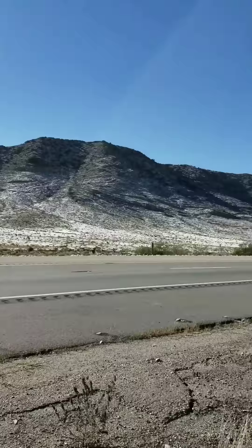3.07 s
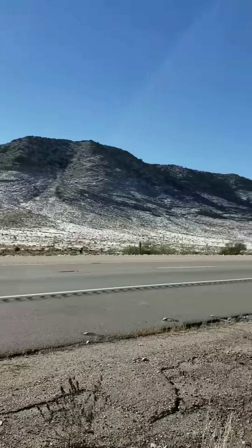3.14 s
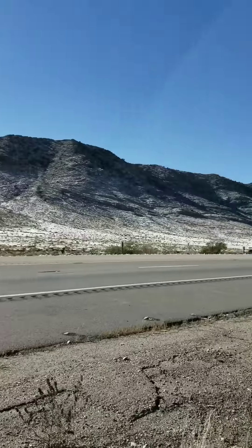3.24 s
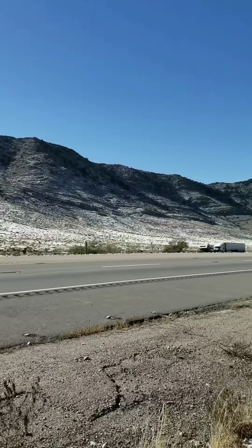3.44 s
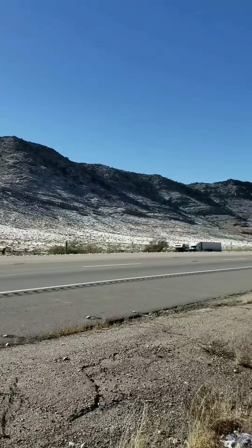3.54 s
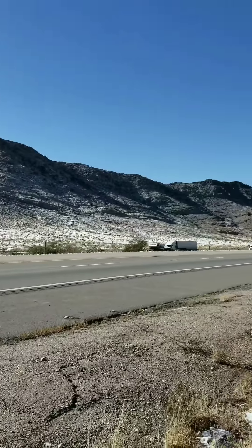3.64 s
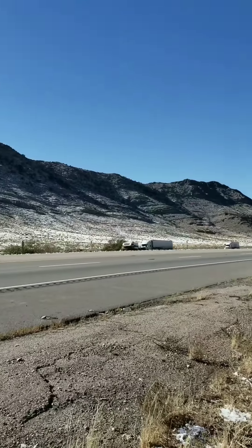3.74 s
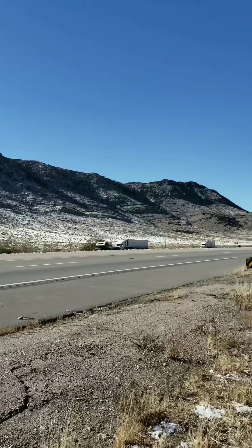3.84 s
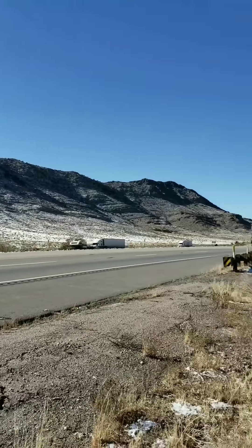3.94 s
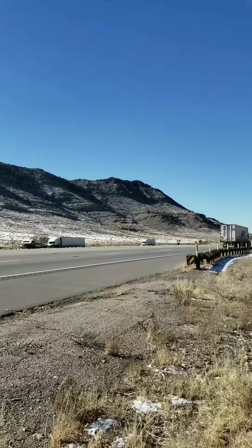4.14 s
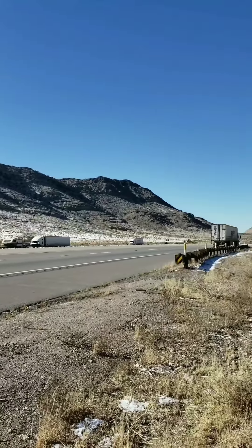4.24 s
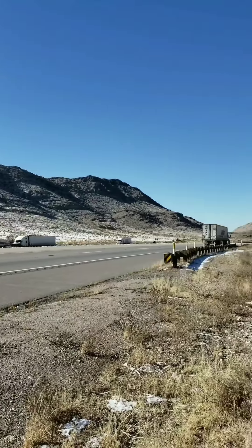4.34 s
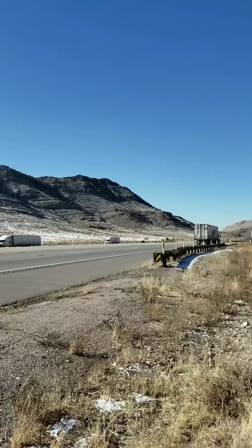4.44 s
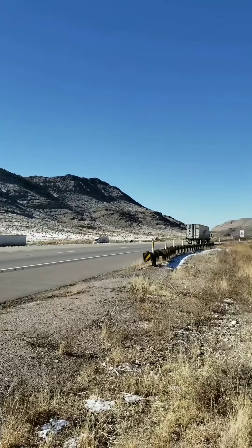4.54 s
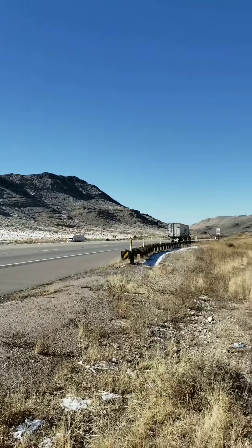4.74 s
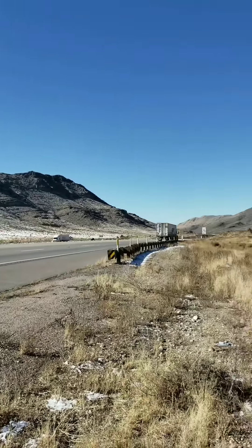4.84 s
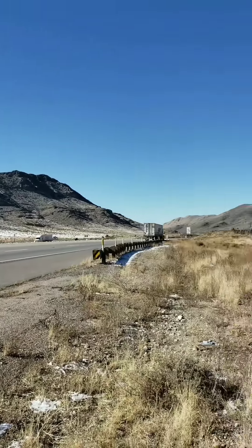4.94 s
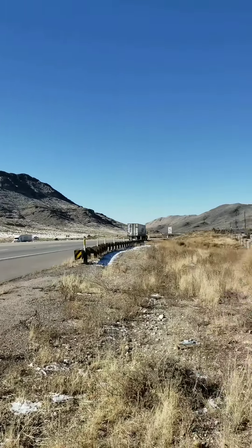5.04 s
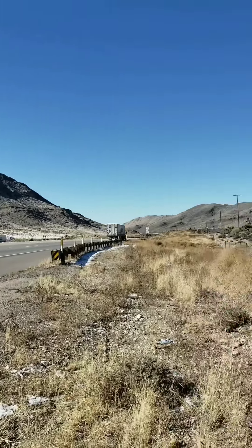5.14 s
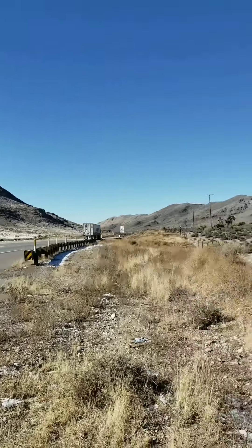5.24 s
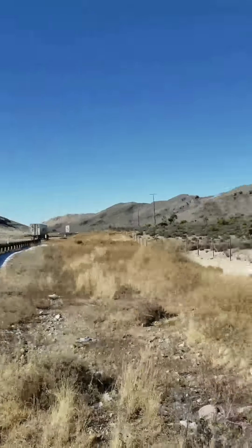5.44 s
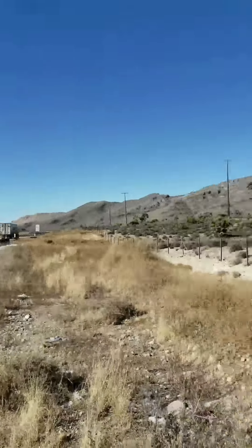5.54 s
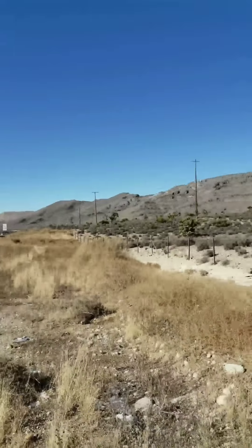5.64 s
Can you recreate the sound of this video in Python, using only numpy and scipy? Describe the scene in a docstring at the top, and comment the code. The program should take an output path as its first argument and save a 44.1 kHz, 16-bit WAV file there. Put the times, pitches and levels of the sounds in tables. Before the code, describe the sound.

Outdoors beside an open desert highway, heard from a hand-held phone. A wind bump starts it while a truck's tyre roar builds fast, jumping up around 0.5 s. It is loud and broad from about 0.7 to 1.9 s, passing closest near 1 s, with a wavering, broken tread whine that slides down in pitch. From roughly 1.7 to 2.7 s, wake wind strikes the two microphone ports separately: deep thumps, rapid fluttering and blunt pops, heaviest around 1.8 to 2.3 s, slightly overloaded. The roar falls away with a thin sizzle, mostly gone by 3.3 s. Then it is quiet, with a patchy mid-pitched hum of far traffic and faint hiss. Irregular wind puffs, low bumps and crackles, often toward the left, continue from 3.4 s, with dry finger ticks and soft rustles on the case near 3.6, 4.2, 5.2 and 5.6 s. A sharp wind cluster lands at the end.

```python
"""A roar swells fast: a long truck passes 11 m from a hand-held phone at the edge of an open desert highway.
Its tyres roar as shaped noise and their tread whines as two partials, falling in pitch as it goes by.
Wind, strongest in the truck's wake, buffets the two microphone ports separately, as noise and short bursts.
Far traffic hums behind as a patchy noise band; fingers tick and rustle on the case; the microphones hiss."""
import sys
import numpy as np
from scipy import signal
from scipy.io import wavfile
from scipy.ndimage import uniform_filter1d

SR = 44100
rng = np.random.default_rng(int(sys.argv[2]) if len(sys.argv) > 2 else 0)


def invert_db(x):
    """Field ratio 10**(x/20) for x, a level in decibels (scalar or array-like)."""
    u = np.asarray(x, float) / 20
    return 10 ** u


def pcm_store(signal):
    """Save signal as 16-bit PCM."""
    levels = np.round(np.clip(np.atleast_2d(signal), -1, 1) * 32767)
    wavfile.write(sys.argv[1], SR, levels.astype(np.int16).T)


N = 250929

FRAME, HOP = 512, 128  # samples per noise frame and step
HZ = np.fft.rfftfreq(FRAME, 1 / SR)
FRAMES_S = np.arange(N // HOP + 5) * HOP / SR

# In every table pan_db is left over right. Spectra are relative: each is scaled to power 1 before its level.

# Distant traffic hum: hz, density_db_per_hz
FAR_SPECTRUM = [(300, -25), (550, -34), (800, 10.5), (1150, 0), (1400, 0.5), (1650, 0), (1900, -4),
                (2300, -11), (3000, -29), (4500, -35.5)]
# Its level as the phone turns along the road: start_s, level_db
FAR_LEVEL = [(0, -41.5), (3, -40), (4.2, -47), (4.7, -45.5), (5.15, -46.5), (5.69, -45)]
# A pale band that drifts as vehicles come and go: start_s, centre_hz, lift_db
FAR_BAND = [(3, 1500, -5), (4.2, 1500, 2), (4.65, 1650, 3.5), (4.8, 1730, 10), (5.05, 1740, 1),
            (5.3, 1800, -1), (5.4, 2030, 6.5), (5.69, 1600, -3)]
FAR_BAND_OCTAVES, FAR_PATCHY_DB = .2, 3.0

# Likeness of road sound at the two ports: hz, shared_power (0-1)
PORT_LIKENESS = [(60, 0.18), (110, 0.25), (200, 0.96), (370, 0.75), (680, 0.75), (1240, 0.91), (2260, 0.83),
                 (4150, 0.27), (7600, 0.01), (13900, 0.06)]
# Phase by which the left port leads on road sound: hz, lead_rad
PORT_LEAD = [(100, -0.046), (1000, -0.35), (2150, -0.72), (2700, -0.9), (4100, -0.16), (6500, -1.44)]
# Balance from the phone's body in the way of road sound: hz, pan_db
BODY_SHADE = [(60, -7), (150, -2), (370, 0), (910, -0.5), (2260, -2.5), (5610, 1), (13900, -4.5)]
# Brief level dips of one port after a cluster of puffs: centre_s, depth_db, length_s, port (0 left, 1 right)
PORT_DIPS = [(3.91, -4, 0.015, 1), (4.25, -12, 0.027, 0), (4.455, -21, 0.011, 0)]

# Microphone hiss: hz, density_db_per_hz
SELF_SPECTRUM = [(2350, -16), (4000, 3.5), (5340, -5), (7930, -2.5), (9310, -30), (11500, -16.5),
                 (14400, -14)]
SELF_DB = -66
# Faint treble hiss that swells now and then: centre_s, peak_db, length_s
HISS_SWELLS = [(3.0, -66, .4), (4.18, -66, .03), (4.33, -65, .04), (5.06, -70, .05), (5.34, -64, .03),
               (5.62, -64, .07)]
# Colour of those swells: hz, density_db_per_hz
SWELL_SPECTRUM = [(3000, -18), (5500, 0), (8000, -1), (9500, -14), (12000, -2), (14400, -2)]

# Gusts on the ports: centre_s, rumble_db, flutter_db, length_s (before any stretch), pan_db
GUSTS = [(.01, -32, -26, 0.0083, 7), (0.184, -36.5, -40, 0.08, 2), (0.285, -24.5, -22.5, 0.017, 3),
         (0.343, -25.5, -23.5, 0.029, -2.5), (0.544, -31.5, -31.5, 0.056, 2),
         (0.843, -35.5, -51, 0.051, -1), (1.64, -32, -32.5, 0.064, -1), (1.725, -28, -18, 0.023, 4.5),
         (1.83, -29, -14, 0.034, -3), (1.91, -20.5, -10, 0.013, 3), (2.043, -24, -14, 0.076, -1),
         (2.118, -41, -16.5, 0.031, -2), (2.201, -25.5, -16, 0.033, -1.5), (2.302, -43, -16, 0.02, -1.5),
         (2.387, -30, -20.5, 0.045, -2), (2.498, -30.5, -21, 0.053, -3.5), (2.566, -28, -23.5, 0.034, 3),
         (2.618, -29.5, -21.5, 0.012, 2), (2.672, -31, -23.5, 0.027, 1), (2.832, -35, -30.5, 0.061, 0),
         (2.939, -44, -29, 0.041, 1.5), (3.016, -36, -33.5, 0.038, 6), (3.13, -33.5, -36, 0.029, 1),
         (3.366, -35.5, -43, 0.069, 10), (3.45, -33, -37, 0.016, -5.5), (3.511, -24, -35.5, 0.0088, 5),
         (3.603, -36, -34.5, 0.031, -2), (3.673, -27.5, -35, 0.055, -1), (3.774, -31, -38.5, 0.043, -2.5),
         (3.866, -22.5, -30, 0.03, 2), (3.946, -25, -34, 0.035, -2.5), (4.027, -28.5, -50, 0.025, -1),
         (4.116, -25, -38, 0.022, 4), (4.16, -25, -34, 0.019, -1), (4.184, -32, -36, 0.0096, 15),
         (4.322, -36, -47, 0.056, 7.5), (4.415, -31.5, -42.5, 0.014, 8.5), (4.485, -31.5, -42.5, 0.011, 19),
         (4.696, -35.5, -48, 0.034, 1.5), (4.787, -45, -54, 0.1, 19), (4.92, -28, -38.5, 0.016, 0),
         (5, -39, -45, 0.014, 16), (5.218, -23, -30, 0.015, 2), (5.244, -38, -38, 0.0067, -15),
         (5.274, -30.5, -42, 0.039, 9), (5.362, -25, -35.5, 0.003, 12), (5.43, -36.5, -41, 0.0089, 2),
         (5.473, -36.5, -46.5, 0.043, 6.5), (5.611, -22, -28.5, 0.01, 2.5), (5.652, -29, -33, 0.0077, 7),
         (5.678, -30.5, -19.5, 0.011, 1.5)]
# Rumble of large eddies: hz, density_db_per_hz
RUMBLE_SPECTRUM = [(20, -19), (40, -9), (70, 1.5), (130, -3), (200, -3), (300, -10), (420, -20), (600, -33),
                   (1200, -80)]
# Flutter of small eddies: hz, density_db_per_hz
FLUTTER_SPECTRUM = [(100, -22.5), (220, -7), (340, 0), (520, -9.5), (800, -13), (1300, -26), (2500, -41),
                    (5000, -70.5)]
CALM_DB, LULL_DB = -36, -53.5  # floors between gusts: rumble, flutter
RUMBLE_STRETCH = 1.37  # large eddies last longer than small ones

# Sudden puffs: start_s, peak_db, pan_db
PUFFS = [(.525, -23, 6), (1.836, -9, 10), (1.914, -33, 6), (1.964, -15.5, -13), (2.002, -18, -5),
         (2.03, -8.5, -12), (2.064, -10.5, -3), (2.129, -10, 3), (2.174, -12, -2), (2.21, -8, -4),
         (2.234, -12.5, -9), (2.294, -10.5, 0), (2.384, -25, -13), (2.489, -16, -6), (2.557, -17, -9),
         (2.603, -20, 1), (2.663, -26, 7), (3.35, -33, 16), (3.69, -29, -7), (3.836, -31, 3),
         (3.869, -38, -2), (3.892, -39, -22), (4.154, -31, -4), (4.193, -23.5, 12), (4.203, -37, 28),
         (4.212, -30, 13), (4.334, -28, 11), (4.393, -27, 4), (4.408, -31, 14), (4.429, -30, 17),
         (4.477, -33.5, 13), (4.487, -36, 12), (4.508, -39, 33), (4.756, -30, 15), (4.878, -31, 2),
         (4.895, -32, 14), (5.012, -34, 14), (5.11, -31, 13), (5.168, -29, 12), (5.187, -33, 6),
         (5.243, -17, 8), (5.273, -28, 11), (5.321, -34, 19), (5.36, -32, 16), (5.548, -33, 5),
         (5.611, -34, -17), (5.514, -32, 16), (5.637, -27, 10), (5.666, -26, -3), (5.672, -13.5, -5),
         (5.677, -15, 10), (5.683, -19.5, 15)]
PUFF_AT_DB, PUFF_HZ, PUFF_S = -25, 827, 0.0012  # a puff of this peak has this typical centre and length
DEEPER_PER_DB, LONGER_PER_DB = .015, 0.13  # stronger puffs are lower and longer (log share per dB)
PUFF_SCATTER, STEP_SHARE = .12, .5  # log spread of centre and length; how much of a puff is one plain push
SMALL_PUFFS, SMALL_FROM_S = 36, 3.3  # faint puffs at random moments once the phone turns into the wind
SMALL_DB, SMALL_PAN_DB = -41, 13  # their middle peak and balance
BURST_RISE_S, SOFT_START = .0008, .3  # shortest rise; rise as a share of a burst's length

# Wind puffs with their own centre and length, from low thumps to crackle:
# start_s, peak_db, pan_db, centre_hz, length_s
TUNED_PUFFS = [(3.36, -25, 13, 800, .004), (3.512, -28, 6, 700, .005), (3.586, -23.5, 13, 794, 0.0051),
               (3.61, -33, 14, 700, 0.0037), (3.63, -30, 15, 795, 0.0062), (3.878, -25, -15, 794, 0.0046),
               (3.818, -31, -2, 800, 0.015), (3.864, -24, -3, 750, .01), (3.885, -26, -2, 800, .006),
               (3.93, -31, -3, 700, .012), (4.004, -21, 0, 260, 0.0024), (4.01, -26, -2, 745, .008),
               (4.175, -34, 4, 700, .01), (4.203, -29, 11, 1000, .008), (4.838, -32.5, 5, 604, 0.0045),
               (5.207, -26, 7, 302, .004), (5.212, -18, 4, 560, .002), (5.219, -19, 1, 356, 0.0024),
               (5.236, -20, 7, 1080, 0.0052), (5.24, -41.5, -1, 2160, 0.0046)]
# Dry ticks and rustles of fingers on the case: start_s, peak_db, pan_db, centre_hz, length_s
TICKS = [(3.59, -41, 0, 2600, 0.0076), (3.648, -40, 1, 2250, .004), (3.875, -52, -5, 3400, .008),
         (3.892, -49, 0, 3200, .002), (4.172, -48, -5, 5500, .002), (4.174, -43, 7, 4000, 0.0033),
         (4.204, -30.5, 10, 1800, 0.0022), (4.205, -40, 0, 3000, .002), (4.195, -36, 8, 1300, .002),
         (4.335, -35, 10, 1700, .002), (4.487, -37.5, 8, 1800, .002), (4.508, -39, 10, 1900, .002),
         (4.13, -56, -12, 7000, 0.082), (4.178, -50, -10, 4540, 0.037), (4.26, -49, -1, 3500, .003),
         (4.412, -49, -3, 3800, .003), (4.438, -52, -3, 4000, .003), (5.042, -53, -7, 4500, .002),
         (5.117, -50, 4, 3180, .003), (5.221, -38, 1, 2000, .002), (5.238, -34, 8, 2300, .002),
         (5.244, -35, 8, 2600, .002), (5.36, -40, 8, 1600, .003), (5.33, -60, -12, 7000, 0.045),
         (5.6, -49, 0, 3020, 0.055), (5.641, -41, 5, 2500, 0.0067), (5.657, -45, 0, 2200, 0.0036),
         (5.666, -40, 2, 3200, .002), (5.676, -37.5, 7, 3260, 0.0035)]

PASS_S, SPEED_M_PER_S, LANE_M = 1.04, 27., 11  # closest moment, truck speed, distance to its lane
REAR_BEHIND_S = 0.33  # the trailer's wheels pass this much later
TREAD_HZ = 432  # tread blocks a second, before Doppler and waver

# Whine swelling as each group of wheels goes by:
# centre_s, partial (1-2), axle (0 front, 1 rear), peak_db (rms, before flutter), length_s
WHINE = [(0.37, 2, 0, -26, 0.02), (0.57, 2, 0, -17, 0.02), (0.704, 1, 0, -22, 0.072),
         (0.72, 2, 0, -17, 0.035), (0.835, 2, 0, -12.5, 0.04), (0.91, 2, 0, -19, 0.013),
         (0.99, 2, 0, -20, 0.052), (1.064, 1, 0, -15, 0.077), (1.17, 2, 0, -21, 0.065),
         (1.185, 2, 1, -22, .08), (1.6, 2, 1, -27, .1), (1.346, 1, 0, -17, 0.063),
         (1.315, 2, 0, -20, 0.044), (1.43, 2, 0, -20, 0.078), (1.494, 1, 0, -21.5, 0.075),
         (1.591, 2, 0, -18, 0.074), (1.713, 2, 0, -20, 0.064), (1.06, 2, 0, -23, .04),
         (1.1, 2, 0, -27, 0.46), (.59, 1, 0, -29, .05), (2.6, 2, 1, -36, 0.16)]

# Tyre roar: start_s, level_db (before offset and tilt), tilt_db_per_octave
ROAR = [(0, -36, -2), (.38, -32, -2.5), (.46, -27, 0.5), (.66, -21.5, -0.5), (.9, -21, -1.5),
        (1.17, -18.5, 0), (1.65, -20, 0), (1.9, -22, 0.9), (2.09, -25.5, -3), (2.43, -33.5, 0),
        (2.8, -37, 2), (3.3, -43, 4.5), (3.5, -50, 0.5), (4.15, -49.5, 1), (4.4, -53, 1), (5.3, -59, 2),
        (5.69, -52, 13)]
# Main body of the roar: hz, density_db_per_hz
ROAR_BODY = [(88, -44), (150, -20), (274, -13), (312, -12.5), (378, -5), (419, -17), (471, -12.5),
             (623, -2.5), (710, -2), (847, -5), (996, -6.5), (1480, -11.5), (2510, -15), (5000, -41),
             (6500, -69), (11000, -120)]
# Treble hiss in the roar: hz, density_db_per_hz
ROAR_HISS = [(2060, -15), (3500, -1), (5170, -9.5), (6660, -12), (7950, -12.5), (9670, -42), (10800, -16),
             (11600, -17.5), (13000, -18), (14400, -38)]
HISS_DB = -11.5  # against the roar's table level, before tilt and air
HISS_PER_TILT, AIR_DB_PER_M = 0.83, 0.29  # hiss rises with brightness; the air dulls it with distance
ROAR_PAN_DB, PAN_DRIFT_DB_PER_S = 0.4, 0.3  # balance at the pass, drifting as the phone turns
# Rear tyres sizzling as the truck pulls away: start_s, lift_db
SIZZLE = [(.3, -19), (1, 0), (1.6, 1), (2.0, 6), (2.3, 3.5), (2.6, 2), (3.2, -12)]
SIZZLE_HZ, SIZZLE_OCTAVES = 4150, 0.19
WAKE_S, WAKE_FLUTTER_DB = 1.15, .6  # from here the wake's flutter grows for a second, to this spread per port swell
# A narrow hiss band near 5.2 kHz: hz, density_db_per_hz
BAND_HISS_SPECTRUM = [(3800, -27), (4500, -5), (5200, 14), (5800, 6.5), (6400, -8), (8000, -50)]
BAND_HISS_S, BAND_HISS_HOLD_S, BAND_HISS_DB = .44, 0.32, -47  # moment it is full, how long it holds, its level
BAND_HISS_RISE_DB_PER_S, BAND_HISS_FALL_DB_PER_S = 448, 49


def read(points, hz):
    """A spectrum table read at any frequency, along a log scale."""
    f, value = np.transpose(points)
    return np.interp(np.log(hz + 1), np.log(f + 1), value)


def columns(rows, t):
    """Every column of a curve table at times t."""
    s, *values = np.transpose(rows)
    return [np.interp(t, s, v) for v in values]


def octave_bell(centre_hz, octaves):
    """A bell over the noise bins, 1 at its centre and even in octaves."""
    return np.exp(-(np.log2((HZ + 1) / centre_hz) / octaves) ** 2)


def swells(t, centre_s, peak_db, length, floor_db):
    """Bell-shaped swells added in power over a floor, as a level in dB."""
    bells = invert_db(peak_db) ** 2 * np.exp(-((t[:, None] - centre_s) / length) ** 2)
    return 10 * np.log10(bells.sum(axis=-1) + invert_db(floor_db) ** 2)


def blotches(frames, bins):
    """A smooth random field over time and frequency, spread 1."""
    field = rng.standard_normal((len(FRAMES_S), len(HZ)))
    field = uniform_filter1d(field, size=frames, axis=0)
    field = uniform_filter1d(field, size=bins, axis=1)
    return field / field.std()


def lumps(frames):
    """Quick random swells, separate for each port, spread 1."""
    swell = rng.standard_normal((2, len(FRAMES_S)))
    swell = uniform_filter1d(uniform_filter1d(swell, size=frames), size=frames)
    return swell / swell.std()


def noise(shape_db, level_db, pan_db, same=0, lead=0, shade_db=0):
    """Noise at two ports from a spectrum scaled to power 1, a level, a balance and a likeness."""
    draws = rng.standard_normal((len(FRAMES_S), len(HZ), 4), dtype=np.float32)
    a, b, c, d = draws.transpose(2, 0, 1)
    left = a + 1j * b
    right = same * left + np.sqrt(1 - same ** 2) * (c + 1j * d)
    right = right * np.exp(-1j * lead)
    shape = invert_db(shape_db + np.zeros(a.shape))
    shape = shape / np.sqrt((shape ** 2).sum(axis=-1, keepdims=True))
    balance_db = np.multiply.outer([.5, -.5], pan_db + 0 * FRAMES_S)
    sides = invert_db(balance_db + level_db)[..., None]
    z = np.array([left, right]) * shape * sides * invert_db(shade_db)
    return signal.istft(z.transpose(0, 2, 1), nperseg=FRAME, noverlap=FRAME - HOP)[1][:, :N]


def road(shape_db, level_db, pan_db):
    """Road noise reaches both ports most alike in the low mids, with a small phase lead and body shade."""
    shade_db = np.multiply.outer([.5, -.5], read(BODY_SHADE, HZ))[:, None]
    same = np.sqrt(read(PORT_LIKENESS, HZ))
    return noise(shape_db, level_db, pan_db, same, read(PORT_LEAD, HZ), shade_db)


def bursts(rows, spread, same, push=0):
    """Noise on a plain push swells quickly and dies away, band-passed spread octaves either side of a centre."""
    out, t = np.zeros((2, N + 8192)), np.arange(8192) / SR
    for s, peak_db, pan_db, centre_hz, length in rows:
        left, other = rng.standard_normal((2, len(t)))
        pair = np.array([left, same * left + np.sqrt(1 - same ** 2) * other])
        pair = (1 - push) * pair + push * np.sign(pair[:, :1])
        decay = np.exp(-t / max(length, .0005))
        rise = np.minimum(t / max(BURST_RISE_S, SOFT_START * length), 1)
        edges = np.clip(centre_hz * 2. ** np.array([-spread, spread]), 50, SR / 5)
        band = signal.butter(2, edges, "band", fs=SR, output="sos")
        burst = signal.sosfilt(band, pair * decay * rise)
        # soft pressure steps carry little treble
        burst = signal.sosfilt(signal.butter(2, 1.3 * edges[1], fs=SR, output="sos"), burst)
        peaks = invert_db(peak_db + np.array([[.5], [-.5]]) * pan_db)
        burst = burst / abs(burst).max(axis=1, keepdims=True) * peaks
        start = round(s * SR)
        out[:, start:start + len(t)] += burst
    return out[:, :N]


def microphone_hiss():
    """The microphones' own steady noise, independent at each port."""
    return noise(read(SELF_SPECTRUM, HZ), SELF_DB, .1)


def treble_swells():
    """Faint treble noise that swells now and then, independent at each port."""
    level_db = swells(FRAMES_S, *np.transpose(HISS_SWELLS), floor_db=-93)
    return noise(read(SWELL_SPECTRUM, HZ), level_db, -2)


def far_traffic():
    """Distant vehicles blend into a patchy hum with one drifting pale band."""
    band_hz, lift_db = columns(FAR_BAND, FRAMES_S)
    band_db = lift_db[:, None] * octave_bell(band_hz[:, None], FAR_BAND_OCTAVES)
    patches_db = FAR_PATCHY_DB * blotches(frames=30, bins=4)
    level_db, = columns(FAR_LEVEL, FRAMES_S)
    return road(read(FAR_SPECTRUM, HZ) + band_db + patches_db, level_db, 1.1)


def port_dips():
    """Gain of each port over time, dipping briefly for sound from the road."""
    t, db = np.arange(N) / SR, np.zeros((2, N))
    for s, depth_db, length, port in PORT_DIPS:
        db[round(port)] += depth_db * np.exp(-((t - s) / length) ** 4)
    return invert_db(db)


def finger_ticks():
    """Fingers on the case make dry ticks and longer rustles, partly alike at both ports."""
    return bursts(TICKS, spread=0.33, same=0.34, push=0.55)


def wind(rumble_lumps_db=2.4, flutter_lumps_db=2.8, bright=0.15):
    """Large eddies rumble; small ones flutter in lumps, and the strong lumps reach higher."""
    s, rumble_db, flutter_db, length, pan_db = np.transpose(GUSTS)
    ports = [.5 * pan_db, -.5 * pan_db]
    low_db = np.array([swells(FRAMES_S, s, rumble_db + p, RUMBLE_STRETCH * length, CALM_DB) for p in ports])
    high_db = np.array([swells(FRAMES_S, s, flutter_db + p, length, LULL_DB) for p in ports])
    rumble = noise(read(RUMBLE_SPECTRUM, HZ), low_db + rumble_lumps_db * lumps(frames=6), 0)
    swell = lumps(frames=3)
    reach = np.exp(bright * np.tanh(swell))[..., None]
    flutter_shape = read(FLUTTER_SPECTRUM, HZ / reach)
    return rumble + noise(flutter_shape, high_db + flutter_lumps_db * swell, 0, same=0.025)


def puffs():
    """Sudden pressure steps on the ports; size sets their pitch and length."""
    when, size, side = rng.random((SMALL_PUFFS, 3)).T
    small_s = SMALL_FROM_S + when * (N / SR - SMALL_FROM_S)
    small_db = SMALL_DB + 6 * (size - .5)
    small_pan_db = SMALL_PAN_DB + 14 * (side - .5)
    small = np.transpose([small_s, small_db, small_pan_db])
    s, peak_db, pan_db = np.vstack([PUFFS, small]).T
    over_db = peak_db - PUFF_AT_DB
    chance = PUFF_SCATTER * rng.standard_normal((len(s), 2)).T
    centre_hz = PUFF_HZ * np.exp(chance[0] - DEEPER_PER_DB * over_db)
    length = PUFF_S * np.exp(chance[1] + LONGER_PER_DB * over_db)
    return bursts(zip(s, peak_db, pan_db, centre_hz, length), spread=0.57, same=0.057, push=STEP_SHARE)


def tuned_puffs():
    """Wind puffs with their own centre and length, mostly noise over a smaller push."""
    return bursts(TUNED_PUFFS, spread=0.46, same=0.12, push=0.28)


def doppler(t):
    """Pitch factor from the truck's speed along the line to the listener."""
    along_m = SPEED_M_PER_S * (t - PASS_S)
    receding = SPEED_M_PER_S * along_m / np.hypot(along_m, LANE_M)
    return 1 / (1 + receding / 343)  # speed of sound, m/s


def whine(waver=.005, flutter_db=6):
    """Tread blocks strike the road in a regular train: two partials an axle, wavering and broken by gusty air."""
    t = np.arange(N) / SR
    slow = rng.standard_normal((2, 3, N))
    slow = uniform_filter1d(uniform_filter1d(slow, size=500), size=500)
    slow = slow / slow.std()
    s, partial, rear, peak_db, length = np.transpose(WHINE)
    out = np.zeros(N)
    for axle in range(2):
        pitch_hz = TREAD_HZ * doppler(t - axle * REAR_BEHIND_S) * (1 + waver * slow[axle, 0])
        turns = np.cumsum(pitch_hz) / SR
        for k in range(1, 3):
            own = (np.round(partial) == k) & (np.round(rear) == axle)
            level_db = swells(FRAMES_S, s[own], peak_db[own], length[own], floor_db=-87)
            db = np.interp(t, FRAMES_S, level_db) - flutter_db * abs(slow[axle, k])
            out += np.sqrt(2) * invert_db(db) * np.sin(2 * np.pi * k * turns)
    return out


def band_hiss():
    """A narrow band of noise near 5.2 kHz switches on steeply, holds, then fades."""
    since = FRAMES_S - BAND_HISS_S
    rise_db = BAND_HISS_RISE_DB_PER_S * np.minimum(since, 0)
    fall_db = BAND_HISS_FALL_DB_PER_S * np.maximum(since - BAND_HISS_HOLD_S, 0)
    return road(read(BAND_HISS_SPECTRUM, HZ), BAND_HISS_DB + rise_db - fall_db, .1)


def wake_flutter():
    """Gain of the roar's body as the wake makes it flutter more and more, the same at both ports."""
    growth = np.clip(FRAMES_S - WAKE_S, 0, 1)
    swell = lumps(frames=4).sum(axis=0) * growth
    return invert_db(WAKE_FLUTTER_DB * np.interp(np.arange(N) / SR, FRAMES_S, swell))


def roar(patchy_db=1.62, offset_db=5):
    """Tyre and air noise of changing brightness, mottled by turbulent air on its way."""
    level_db, tilt = columns(ROAR, FRAMES_S)
    pan_db = ROAR_PAN_DB + PAN_DRIFT_DB_PER_S * (FRAMES_S - PASS_S)
    away_m = np.hypot(SPEED_M_PER_S * (FRAMES_S - PASS_S), LANE_M)
    mottle_db = patchy_db * blotches(frames=16, bins=4)
    tilt_db = np.outer(tilt, np.log2(np.clip(HZ, 200, 5000) / 1000))
    sizzle_lift_db, = columns(SIZZLE, FRAMES_S)
    sizzle_db = np.outer(sizzle_lift_db, octave_bell(SIZZLE_HZ, SIZZLE_OCTAVES))
    body_shape = read(ROAR_BODY, HZ) + mottle_db + tilt_db + sizzle_db
    body = road(body_shape, level_db + offset_db - tilt, pan_db)
    hiss_db = level_db + HISS_DB + HISS_PER_TILT * tilt - AIR_DB_PER_M * away_m
    hiss = road(read(ROAR_HISS, HZ) + mottle_db, hiss_db, pan_db)
    return body * wake_flutter() + hiss


def scene():
    """The roadside at the two ports: truck and far traffic, wind, handling and hiss."""
    dipped = (far_traffic() + whine() + band_hiss() + roar()) * port_dips()
    on_ports = wind() + puffs() + tuned_puffs()
    return microphone_hiss() + treble_swells() + finger_ticks() + on_ports + dipped


def low_pass(x):
    """Removes everything above the highest recorded frequency."""
    return signal.sosfilt(signal.butter(12, 14510, fs=SR, output="sos"), x)


def record(dry):
    """The phone's microphones drop the deepest bass and overload softly at the loudest moments."""
    low_cut = signal.butter(2, 58, "high", fs=SR, output="sos")  # Hz
    thinned = signal.sosfilt(low_cut, dry)
    mix = np.tanh(thinned * 0.59) / 0.62
    return low_pass(mix)


dry = scene()
out = record(dry)
pcm_store(out)
```